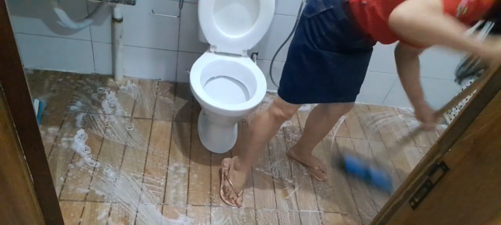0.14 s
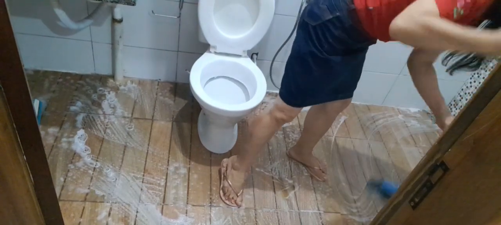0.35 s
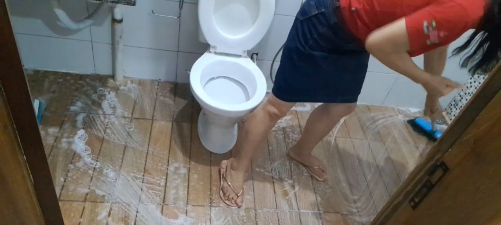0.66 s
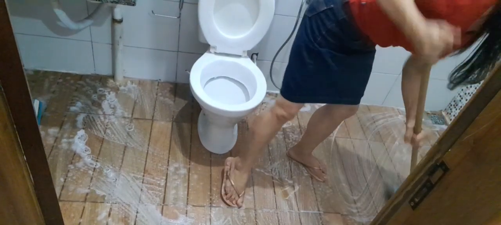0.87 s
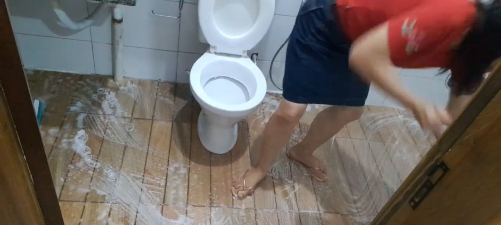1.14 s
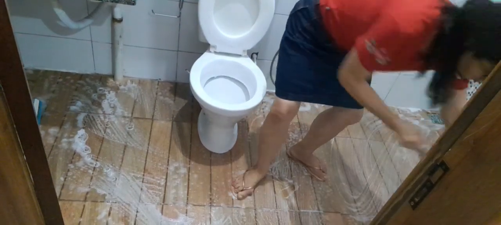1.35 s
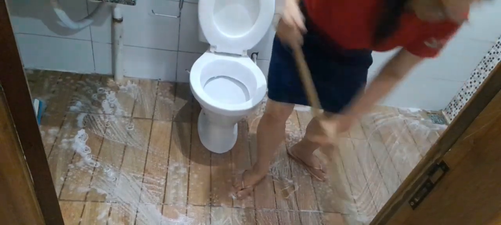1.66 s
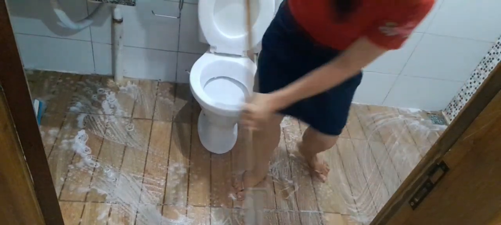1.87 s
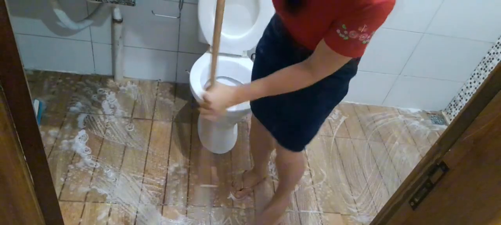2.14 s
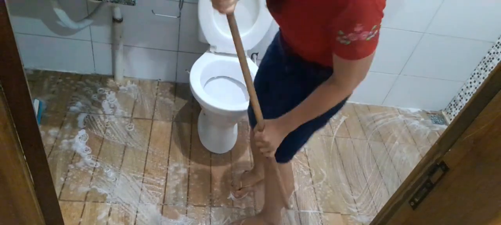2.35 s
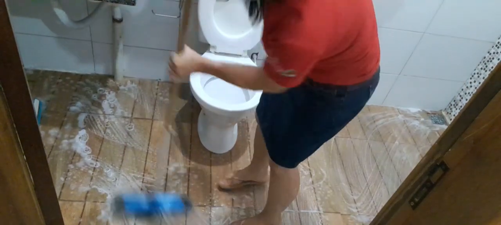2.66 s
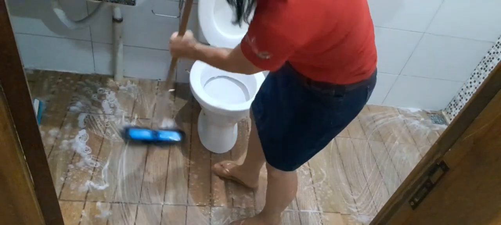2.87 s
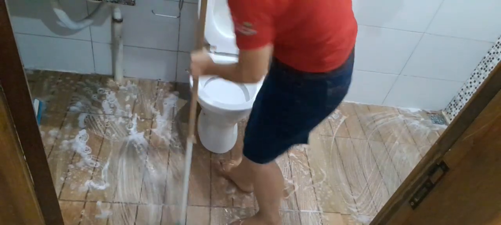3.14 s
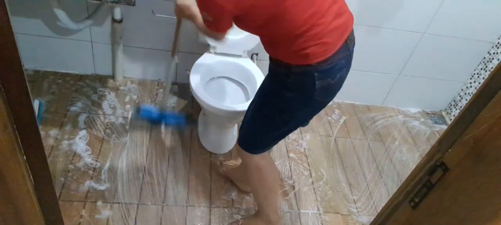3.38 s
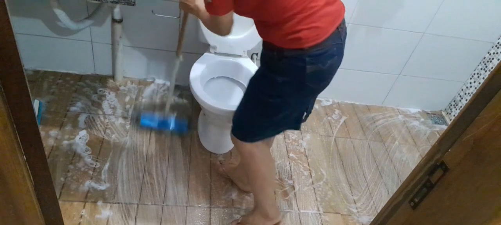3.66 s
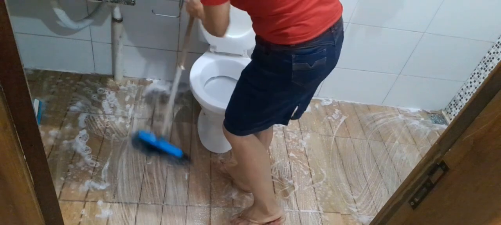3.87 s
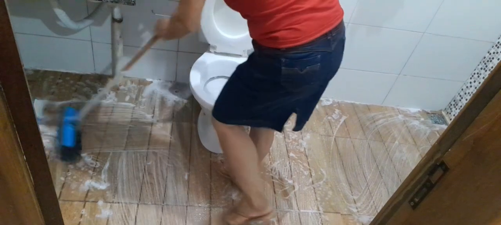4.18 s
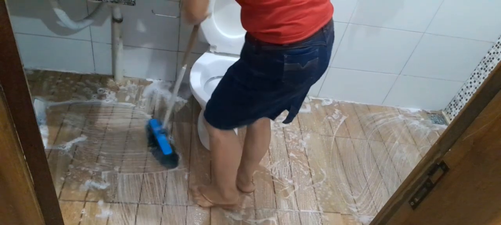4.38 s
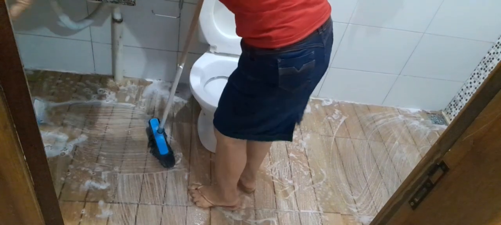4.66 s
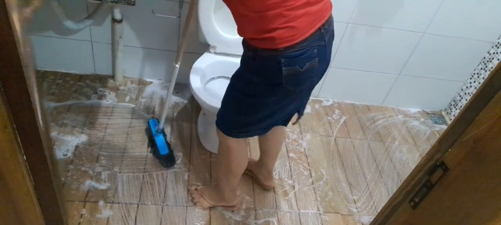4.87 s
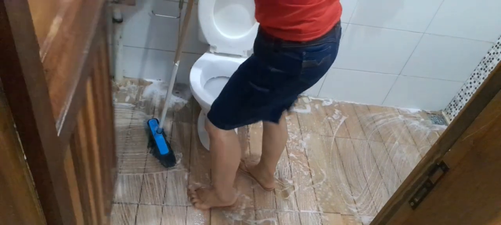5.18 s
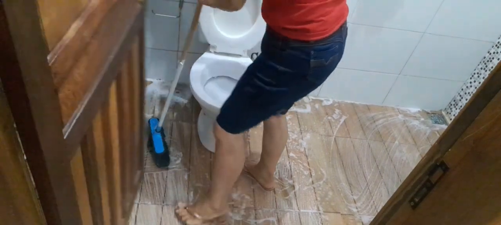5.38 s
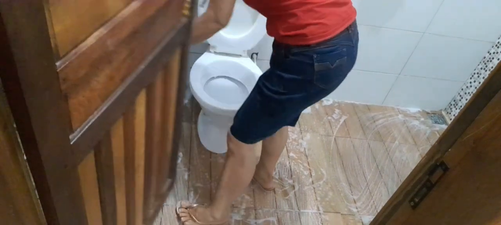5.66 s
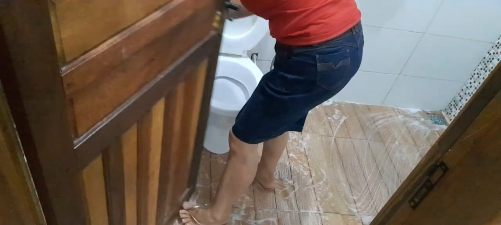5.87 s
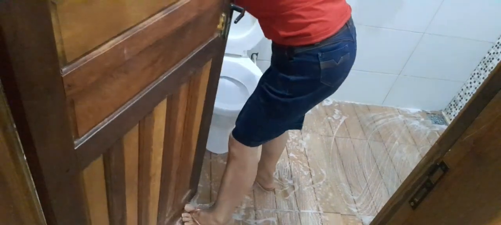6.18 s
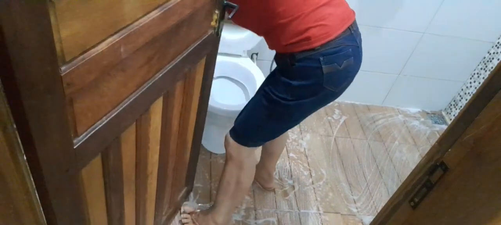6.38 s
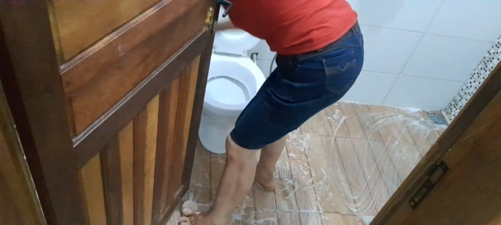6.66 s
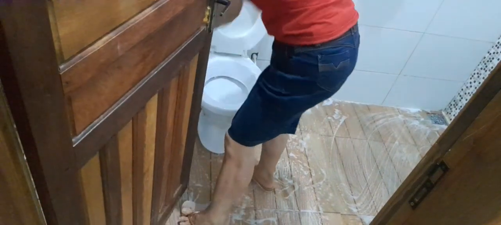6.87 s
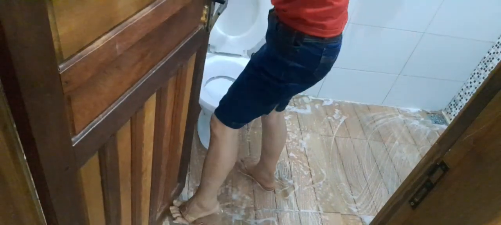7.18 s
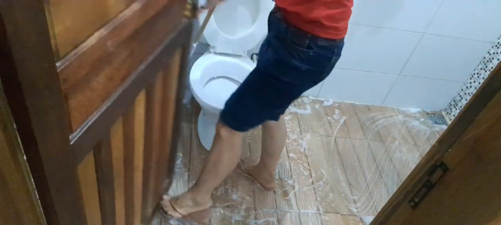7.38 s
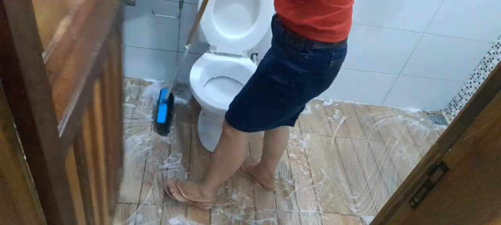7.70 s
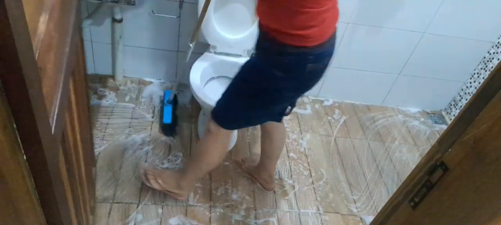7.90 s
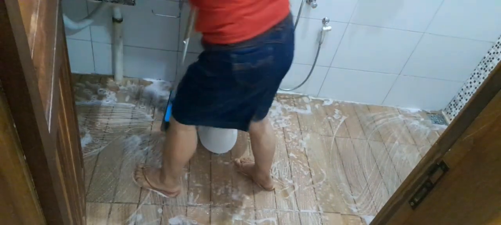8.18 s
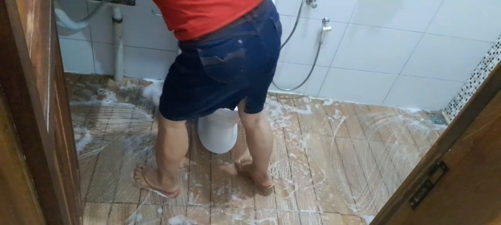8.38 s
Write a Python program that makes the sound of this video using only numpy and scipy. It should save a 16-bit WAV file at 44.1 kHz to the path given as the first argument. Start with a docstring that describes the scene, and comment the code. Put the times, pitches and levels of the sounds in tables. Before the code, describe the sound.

A stiff broom scrubs wet, soapy tiles in an echoing bathroom, its plastic head knocking, with dull door thumps and light sandal pats.

```python
"""A stiff broom scrubs a wet, soapy tiled floor: with every stroke its bristles flick and the foam fizzes.
The plastic head knocks against walls and fittings with a brief ring. Later a wooden door swings aside
and back with dull thumps and a faint hinge squeak, and sandals pat on the wet tiles.
It is all heard from the doorway of a small bathroom whose hard walls echo, over a faint, dull hush."""
import sys
import numpy as np
from scipy import signal
from scipy.fft import rfft, irfft, next_fast_len
from scipy.io import wavfile
from scipy.ndimage import uniform_filter1d

SR = 44100
rng = np.random.default_rng(int(sys.argv[2]) if len(sys.argv) > 2 else 0)


def store_pcm(level_fs):
    """Save levels as 16-bit WAV."""
    pcm = np.round(np.clip(level_fs, -1, 1) * 32767).astype(np.int16)
    wavfile.write(sys.argv[1], SR, np.atleast_2d(pcm).T)


N = 376613

# Broom strokes. Fizz and rub are the levels halfway through; growth is their change from start to end.
# t/s, length/s, fizz/dB, rub/dB, fizz growth/dB, rub growth/dB
BROOM_STROKES = [ (-0.08, 0.53, -37, -41, -4.5, 1), (0.347, 0.36, -38, -39, 16.5, 3),
                 (0.779, .315, -36.5, -46, 2, 12), (0.92, .11, -50, -40.5, -1, -9),
                 (1.057, 0.36, -37, -39, 4, -5), (1.46, .431, -38, -43, 10, 2),
                 (1.875, 0.29, -32.5, -41, -5, -1.5), (2.214, 0.31, -36, -40, -9, -3),
                 (2.551, 0.47, -36, -40, -9.5, -5), (2.989, 0.24, -36.5, -42, 0.5, 4.5),
                 (3.264, 0.41, -34.5, -38, -8, 15), (3.681, 0.19, -38, -43, 6, 4),
                 (3.939, 0.14, -38, -46.5, -6, 5), (4.022, 0.21, -40, -38, 5, -8),
                 (4.24, 0.13, -43, -51.5, 2, 0), (4.348, .16, -36, -45, -7.5, -7),
                 (4.587, 0.12, -69, -57.5, 12, 5), (5.412, 0.25, -60, -59, 2, 9),
                 (5.572, 0.21, -42, -44, 8, 20), (5.775, 0.21, -34.5, -43.5, -3.5, -6),
                 (6.032, 0.28, -38, -46, -3, 1), (6.302, 0.37, -36.5, -42, -4, -15),
                 (6.665, 0.43, -38.5, -45, 5, -2.5), (7.154, 0.23, -47, -49.5, -10, -8),
                 (7.368, 0.25, -64, -60, -1, -4), (7.988, 0.3, -70.5, -65, -14, 7),
                 (8.39, 0.21, -68, -62, 14.5, -2)]
# Tone colour (how strong each frequency is) of bristle tips in foam: f/Hz, level/dB
FIZZ_COLOUR = [(2000, -19), (4000, -7), (5800, -6), (8200, -10.5), (10000, -5.5), (12000, -2.5),
               (14000, -3.5), (15500, -6.5)]
# Tone colour of bristles rubbing the tiles: f/Hz, level/dB
RUB_COLOUR = [(50, -15), (110, -11.5), (200, -10), (420, -8), (900, -2.5), (1400, 1), (2200, -0.5),
              (3200, -2.5), (5000, -6), (8000, -12), (15000, -33)]

def scrubbing(spots, catch_db=2.0):
    """Bristles catch and spring free: their tips fizz in the foam, their shafts rub the tiles."""
    _, _, fizz_db, rub_db, fizz_growth_db, rub_growth_db = np.transpose(BROOM_STROKES)
    catching = catch_db * wobble(per_s=70)
    fizz_level = stroke_level(fizz_db, fizz_growth_db, speed_power=0.36, rest_db=-70) + catching
    rub_level = stroke_level(rub_db, rub_growth_db, speed_power=0.49, rest_db=-72.5) + catching
    fizz = bristle_flicks(fizz_level, per_s=7000, scatter_db=2.0, tufts=len(spots))
    rub = bristle_flicks(rub_level, per_s=2500, scatter_db=3.5, tufts=len(spots))
    size = next_fast_len(N + spots.shape[-1], True)
    echoes = rfft(spots, size)  # the broom is wide: each tuft has its own spot and its own echoes
    spectrum = 0
    for snaps, colour in ((fizz, FIZZ_COLOUR), (rub, RUB_COLOUR)):
        echoing = np.sum(rfft(snaps, size)[:, None] * echoes, axis=0)
        spectrum = spectrum + echoing * rfft(click(colour), size)
    return irfft(spectrum, size)[:, :N]


def stroke_level(levels_db, growths_db, speed_power, rest_db):
    """Level in dB over time: in each stroke the broom speeds up and stops, as pressure grows or eases."""
    t = np.arange(N) / SR
    energy = np.full(N, gain(rest_db) ** 2)  # foam and bristles never fall quite silent
    for (start_s, length_s, *_), db, growth_db in zip(BROOM_STROKES, levels_db, growths_db):
        during = (t > start_s) & (t < start_s + length_s)
        from_middle = (t[during] - start_s) / length_s - .5
        speed = 1 - (2 * from_middle) ** 2
        energy[during] += (speed ** speed_power * gain(db + growth_db * from_middle)) ** 2
    return 10 * np.log10(energy)


def bristle_flicks(level_db, per_s, scatter_db, tufts):
    """Countless tiny snaps of very unequal strength, shared out among the broom's tufts."""
    total = int(per_s * N / SR)
    when, tuft, sign, luck = rng.random((total, 4)).T
    when = (when * N).astype(int)
    boost_db = scatter_db * np.minimum(-np.log(1 - luck), 6)  # most are weak, a few are strong
    strength = gain(boost_db) * np.sign(sign - .5)
    snaps = np.zeros((tufts, N), dtype=np.float32)
    snaps[(tuft * tufts).astype(int), when] = unit_energy(strength) * np.sqrt(N) * gain(level_db[when])
    return snaps


# Knocks of the broom head. Ring and direct (echo-free) levels count from the knock's own level.
# t/s, level/dB, treble edge/Hz, bass edge/Hz, focus/Hz, broom ring/dB, hollow ring/dB,
# chatter/s, direct/dB
BROOM_KNOCKS = [ (0.008, -22.5, 2230, 225, 1170, -16.5, -32, .014, -10.5),
                (0.024, -25.5, 2000, 606, 1140, -14.5, -45, 0.012, -6),
                (1.139, -28.5, 1160, 236, 650, -27, -30, 0.014, -14),
                (1.354, -27, 2950, 153, 1100, -19, -38.5, 0.011, -6),
                (1.361, -22.5, 3160, 278, 2040, -8.5, -37, 0.016, -13),
                (1.779, -37.5, 1800, 139, 1420, -11, -13, 0.032, -18),
                (2.632, -49.5, 1600, 400, 885, -24, -2, .02, -22),
                (3.110, -59, 1400, 101.2, 590, -14.5, -17.5, .03, -24),
                (3.594, -19, 1700, 204, 570, -13, -1, 0.01, -10),
                (3.614, -25.5, 1710, 204, 760, -13, -22, 0.01, -17),
                (3.800, -36.5, 1107, 190, 538, -21, 0, 0.016, -19),
                (3.845, -37.5, 1310, 187, 600, -16.5, -3, 0.018, -22),
                (5.680, -44, 1510, 260, 900, -29, -29, 0.071, -24),
                (6.542, -23, 3000, 257, 1240, -36, -23.5, 0.023, -10), ]
# Tone colour of the plastic clack: f/Hz, level/dB
CLACK_COLOUR = [(50, 2.5), (120, -1), (230, -1), (450, -2), (900, -0.5), (1300, -2), (2100, -0.5),
                (2700, -3), (5000, -2.5), (8200, -4), (12000, 7), (15500, -11)]
# Ringing tones of the head and handle: f/Hz, level/dB, fade time/s (to drop by 60 dB)
BROOM_TONES = [(284, -8, 0.72), (405, 1, 0.61), (430, 2, .55), (444, 2.5, 0.47), (481, 1.5, 0.61),
               (1150, -10.5, 0.35), (1364, -2.5, 0.42), (1410, 4, .35), (1600, -4.5, 0.32), (2000, -4, .35),
               (2120, -5, 0.5), (2415, -12, 0.26)]
# Hollow ring of the struck fitting together with the room's low notes: f/Hz, level/dB, fade time/s
FITTING_AND_ROOM_TONES = [(177, -15.5, 0.79), (224.6, -3.5, 0.4), (233.2, -4.5, 0.45), (299.5, -9.5, 0.62),
                          (381, -12.5, 0.78), (458, -9, 0.46), (506, -11.5, 0.39), (537, -2, 0.71),
                          (555, -7.5, 0.91), (702, -5.5, 0.62), (765, 5, .48), (791, 4.5, 0.47),
                          (817, -4.5, 1), (904, -10.5, .6), (1000, -12.5, 0.54), (1640, -12.5, .4)]

def broom_knocks(spots):
    """The broom head clacks against something hard; head, handle, fitting and room ring on."""
    track = np.zeros((2, N))
    for k, knock in enumerate(BROOM_KNOCKS):
        start_s, db, treble_hz, bass_hz, focus_hz, broom_db, hollow_db, chatter_s, direct_db = knock
        clack = chatter(click(CLACK_COLOUR, treble_hz, bass_hz, focus_hz), chatter_s, first_blow=0.23)
        broom = gain(broom_db) * ring(BROOM_TONES, swell_s=0.0046)
        hollow = gain(hollow_db) * ring(FITTING_AND_ROOM_TONES, swell_s=0.0053)
        add(track, start_s, gain(db) * in_room(clack, spots[k % len(spots)], direct_db))
        add(track, start_s, gain(db) * (broom + hollow))
    return track


# Thumps of the door: t/s, boom level/dB, rattle above the boom/dB, treble edge/Hz
DOOR_THUMPS = [(4.815, -59.5, 6, 1500), (4.875, -61, 1, 1210), (5.029, -62.5, 7, 1500),
               (5.180, -70, 16, 1200), (5.898, -49.5, -10, 400), (5.947, -40.5, 7, 1570),
               (6.145, -53, -18, 300), (7.218, -43, -7.5, 500), (7.250, -39.5, -0.5, 770),
               (7.545, -56, -1, 1000)]
# Low boom of the door and the bathroom's own low notes, set off by each thump:
# f/Hz, level/dB, fade time/s
DOOR_AND_ROOM_TONES = [(55, 3, 0.68), (59.6, -5, 0.506), (81.6, 1, 0.63), (120, 4, 0.61),
                       (161.3, 1.5, 0.49), (220, -9, 0.56), (300, -21, 1), (379, -13, 0.91), (484, -58, .5)]
# Tone colour of the door's rattling panels: f/Hz, level/dB
RATTLE_COLOUR = [(30, -18), (55, 5.5), (120, -3), (300, -1), (430, -10), (650, -3.5), (950, -8.5),
                 (1600, -4.5), (3000, -7), (8000, -16)]
# Clinks of the metal latch: t/s, level/dB
LATCH_CLINKS = [(7.252, -51.5), (7.335, -54.5)]
# Ringing tones of the latch: f/Hz, level/dB, fade time/s
LATCH_TONES = [(840, -3, 0.46), (899, -5, 0.41), (1005, -13, .3)]

def door(spots, direct_db=-10, lean_db=0.3):
    """Each thump makes door and room boom together and rattles the panels; the latch clinks twice."""
    track = np.zeros((2, N))
    boom = ring(DOOR_AND_ROOM_TONES, swell_s=0.0067)
    for k, (start_s, db, rattle_db, treble_hz) in enumerate(DOOR_THUMPS):
        rattle = chatter(click(RATTLE_COLOUR, treble_hz), chatter_s=0.0102, first_blow=0.64)
        add(track, start_s, gain(db) * boom)
        add(track, start_s, gain(db + rattle_db) * in_room(rattle, spots[k % len(spots)], direct_db))
    for start_s, db in LATCH_CLINKS:
        add(track, start_s, gain(db) * ring(LATCH_TONES, swell_s=0.0015))
    return track * gain([[-lean_db], [lean_db]])  # slightly to the right


# Faint squeaks of the hinge: t/s, length/s, f/Hz, level/dB
HINGE_SQUEAKS = [(4.881, 0.17, 940, -61), (5.095, 0.016, 957, -49.5), (5.121, 0.021, 858, -48),
                 (5.164, 0.081, 940, -64)]

def hinge(echoes, waver=0.013, overtone_db=-14, direct_db=-4, echo_db=-4):
    """The hinge pin sticks and slips at a slightly unsteady rate; the room carries the squeak on."""
    track = np.zeros(N)
    unsteady = 1 + waver * wobble(per_s=90)
    for start_s, length_s, hz, db in HINGE_SQUEAKS:
        span = slice(int(start_s * SR), int((start_s + length_s) * SR))
        phase = 2 * np.pi * np.cumsum(hz * unsteady[span]) / SR
        tone = np.sin(phase) + gain(overtone_db) * np.sin(2 * phase)
        track[span] += gain(db) * np.sqrt(2) * tone * signal.windows.tukey(len(phase), .5)
    return gain(direct_db) * track + gain(echo_db) * convolve(track[None], echoes)


# Wet pats and light taps: t/s, level/dB, treble edge/Hz, bass edge/Hz, chatter/s, direct/dB
SANDAL_PATS = [(4.789, -54, 6400, 2370, 0.0024, -6), (4.816, -52.5, 3160, 575, 0.017, -22),
               (4.870, -57.5, 6000, 800, .005, -2.5), (4.895, -62, 600, 340, 0.018, -14),
               (5.030, -63, 2600, 497, 0.013, -16), (5.101, -56, 1590, 690, 0.003, -8),
               (5.180, -57, 2700, 2250, 0.0025, -9), (5.491, -56, 4030, 410, 0.0035, -8),
               (7.524, -57, 1980, 605, 0.013, -6), (7.560, -60.5, 2000, 900, 0.0083, -3),
               (7.727, -56, 1930, 752, .009, -20), (7.762, -60, 2620, 696, 0.011, -9),
               (8.113, -61, 3300, 914, .007, -13), (8.137, -56, 2310, 800, 0.016, -22),
               (8.204, -52.5, 6450, 804, 0.012, -10), (8.19, -62, 700, 91, 0.035, -22),
               (8.439, -69, 2030, 300, 0.034, -15)]
# Tone colour of a wet slap: f/Hz, level/dB
SLAP_COLOUR = [(80, 40), (400, 10.5), (1200, 1.5), (2500, 1), (5000, -5), (8000, -6.5), (12000, -3.5),
               (15500, -2)]

def sandals(spots):
    """Sandals slap and tap lightly on the wet tiles."""
    track = np.zeros((2, N))
    for k, (start_s, db, treble_hz, bass_hz, chatter_s, direct_db) in enumerate(SANDAL_PATS):
        slap = chatter(click(SLAP_COLOUR, treble_hz, bass_hz), chatter_s, first_blow=0.2)
        add(track, start_s, gain(db) * in_room(slap, spots[k % len(spots)], direct_db))
    return track


# How long the bathroom's echo lasts: f/Hz, fade time/s
ECHO_FADE = [(60, 1), (250, 0.59), (700, 0.53), (1400, 0.53), (2500, 0.58), (5000, 0.54), (9000, 0.4),
             (15000, 0.38)]
# Standing waves, the low notes that build up between the walls: f/Hz, boost/dB
STANDING_WAVES = [(53, 12), (82, 17), (120, 7), (136, 13.5), (173, 7), (231, -1), (301, 0), (429, 5)]

def bathroom_echoes(build_s=0.00096, wave_width_hz=7, bands=9, size=32768):
    """Echoes from six spots on the floor: they build up fast off the tiles and fade band by band."""
    t, hz = np.arange(size) / SR, frequencies(size)
    standing = gain(sum(db / (1 + ((hz - f) / wave_width_hz) ** 2) for f, db in STANDING_WAVES))
    noise = np.array([stereo_noise(size) * standing for _ in range(6)], dtype=np.complex64)
    centres_hz = np.geomspace(80, 16000, bands)
    build_up = 1 - np.exp(-t / build_s)
    echoes = 0
    for centre_hz, this_band in zip(centres_hz, np.eye(bands)):
        share = np.interp(hz, centres_hz, this_band).astype(np.float32)
        fade = np.exp(-np.log(1000) * t / at_hz(ECHO_FADE, centre_hz))
        tail = irfft(noise * share) * (fade * build_up).astype(np.float32)
        echoes = echoes + unit_energy(tail) * np.sqrt(share.mean())
    return unit_energy(echoes)


# Tone colour of the background hush: f/Hz, level/dB
HUSH_COLOUR = [(20, -35.5), (38, -17), (55, -1), (110, 3), (200, -6), (450, -2), (900, -6), (2000, -26),
               (6000, -23), (15000, -37.5)]

def hush(level_db=-66.5):
    """A faint, dull, steady background noise."""
    spectrum = stereo_noise(N) * gain(at_hz(HUSH_COLOUR, frequencies(N)))
    return unit_energy(irfft(spectrum, N)) * np.sqrt(N) * gain(level_db)


# How alike the room sounds on the left and right: f/Hz, likeness (1 = the same, 0 = unrelated)
STEREO_LIKENESS = [(50, 0.8), (130, 0.47), (250, .86), (500, 0.66), (1000, 0.22), (2000, -0.09),
                   (4000, -0.028)]

def stereo_noise(size):
    """Spectra of two noises that are alike in the bass and unrelated in the treble."""
    mid, side = rfft(rng.standard_normal((2, size)))
    alike = np.clip(at_hz(STEREO_LIKENESS, frequencies(size)), -1, 1)
    return mid * np.sqrt(1 + alike) + side * np.sqrt(1 - alike) * np.array([[1], [-1]])


def click(colour, treble_hz=None, bass_hz=None, focus_hz=None, focus_db=7, focus_octaves=0.75, size=4096):
    """One sharp contact with the given tone colour."""
    hz = frequencies(size) + 1
    shape = gain(at_hz(colour, hz))
    if treble_hz:  # a soft contact dulls the click
        shape = shape / np.sqrt(1 + (hz / treble_hz) ** 4)
    if bass_hz:  # a small contact thins the bass
        shape = shape * (.01 + 1 / np.sqrt(1 + (bass_hz / hz) ** 8))
    if focus_hz:  # the struck part boosts a broad band of frequencies
        shape = shape * gain(focus_db * np.exp(-(np.log2(hz / focus_hz) / focus_octaves) ** 2))
    # keep the colour but pack the energy at the very start (minimum phase)
    cepstrum = irfft(np.log(shape))
    cepstrum[1:size // 2] *= 2
    cepstrum[size // 2 + 1:] = 0
    return unit_energy(irfft(np.exp(rfft(cepstrum))))


def chatter(sound, chatter_s, first_blow, size=8192):
    """A blow and a dying flurry of tiny contacts, which smear a click but keep its colour."""
    t = np.arange(size) / SR
    contacts = rng.standard_normal(size) * (rng.random(size) < .08)
    contacts = unit_energy(contacts * np.exp(-t / chatter_s))
    contacts[0] += first_blow
    spectrum = rfft(contacts, 2 * size)
    colourless = irfft(spectrum / (np.abs(spectrum) + 1e-9))[:size]
    return unit_energy(convolve(colourless, sound))


def ring(tones, swell_s, size=32768):
    """Tones set off by a blow: they swell within milliseconds, then each fades at its own pace."""
    t = np.arange(size, dtype=np.float32) / SR
    hz, db, fade_s = np.array(tones, dtype=np.float32).T[:, :, None]
    cycles = hz * t + rng.random(hz.shape).astype(np.float32)
    waves = gain(db) * np.exp(-float(np.log(1000)) * t / fade_s) * np.sin(2 * np.pi * cycles)
    swell = 1 - np.exp(-(t / swell_s) ** 2)
    return unit_energy(waves.sum(axis=0) * swell)


def in_room(sound, echoes, direct_db):
    """A sound's echoes, plus the part that travels straight to the listener."""
    heard = convolve(sound[None], echoes)
    heard[:, :len(sound)] += gain(direct_db) * sound
    return heard


def add(track, start_s, sound):
    """Lay a sound into a stereo track; its energy counts as a level over a tenth of a second."""
    start = max(int(start_s * SR), 0)
    part = sound[..., :N - start]
    track[:, start:start + part.shape[-1]] += part * np.sqrt(SR / 10)


def wobble(per_s):
    """A smooth random drift with a typical size of one."""
    hold = max(int(SR / per_s), 1)
    steps = np.repeat(rng.standard_normal(N // hold + 1), hold)[:N]
    drift = uniform_filter1d(steps, hold)
    return drift / drift.std()


def convolve(sound, response):
    """Pass a sound through a response, such as a room's echoes."""
    return signal.fftconvolve(sound, response, axes=-1)[..., :N]


def gain(db):
    """Turn decibels into a multiplier."""
    return 10 ** (np.asarray(db) / 20)


def at_hz(table, hz):
    """Read between the rows of a frequency table, with octaves evenly spaced."""
    f, value = np.transpose(table)
    return np.interp(np.log(np.maximum(hz, 1)), np.log(f), value)


def unit_energy(x):
    """Scale to an average energy of one per channel."""
    return x / np.sqrt(np.mean(np.sum(x ** 2, axis=-1)))


def frequencies(size):
    """The frequencies in the spectrum of a sound this many samples long."""
    return np.arange(size // 2 + 1) * SR / size


def scene():
    """Broom, door and sandals all sound in the same tiled room."""
    spots = bathroom_echoes()
    broom = scrubbing(spots) + broom_knocks(spots)
    return broom + door(spots) + hinge(spots[0]) + sandals(spots) + hush()


def record(dry, right_over_left_db=0.55, top_hz=15750):
    """Lean the sound slightly to the right and cut the highest treble steeply."""
    leaning = dry * gain([[-right_over_left_db / 2], [right_over_left_db / 2]])
    treble_cut = signal.ellip(12, .1, 80, top_hz, fs=SR, output="sos")
    return signal.sosfilt(treble_cut, leaning)


dry = scene()
out = record(dry)
store_pcm(out)
```